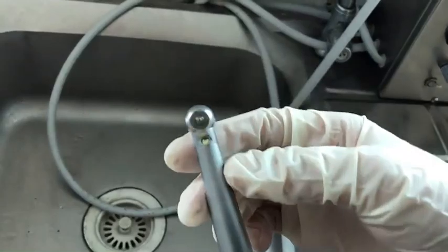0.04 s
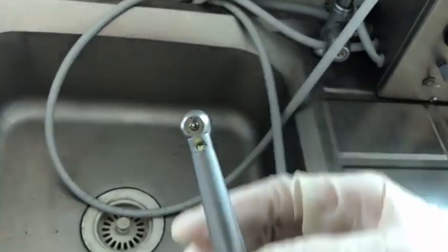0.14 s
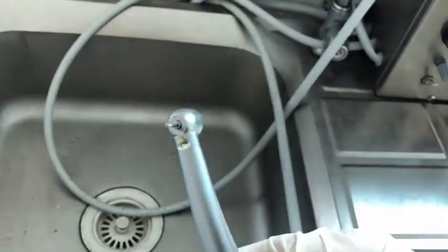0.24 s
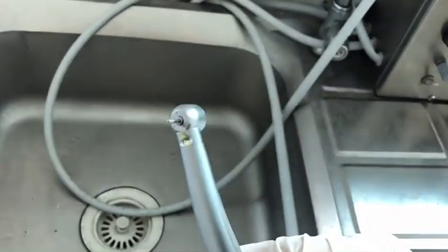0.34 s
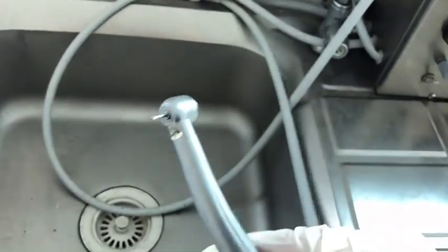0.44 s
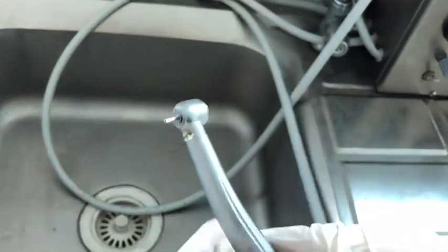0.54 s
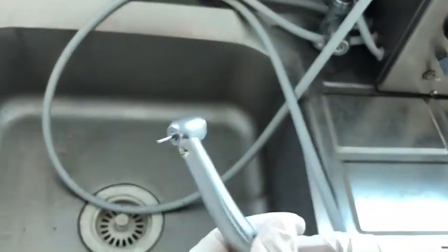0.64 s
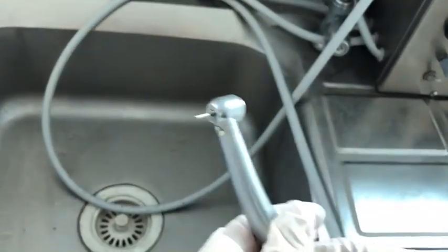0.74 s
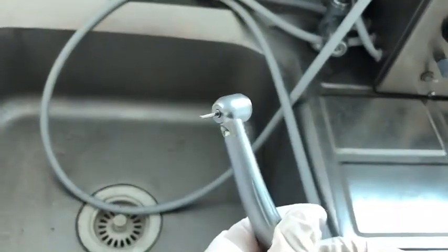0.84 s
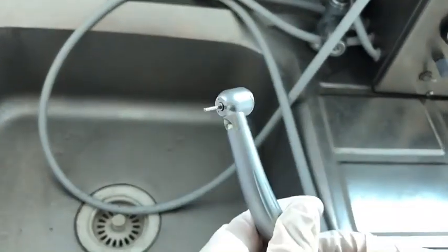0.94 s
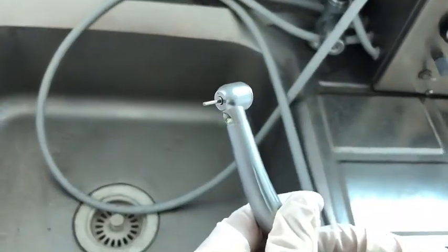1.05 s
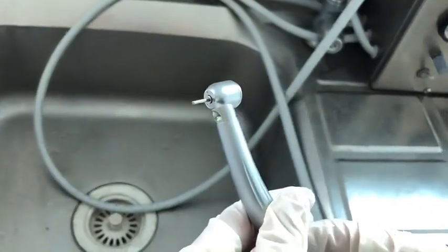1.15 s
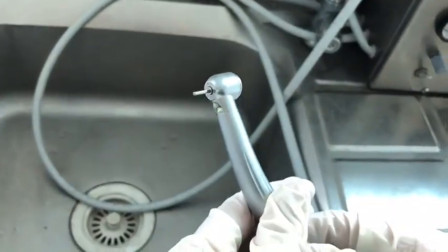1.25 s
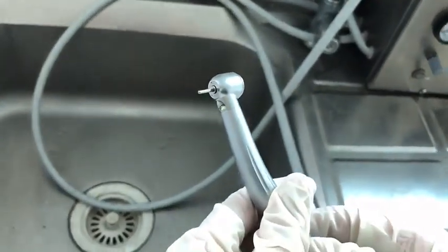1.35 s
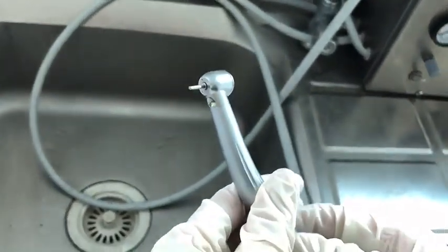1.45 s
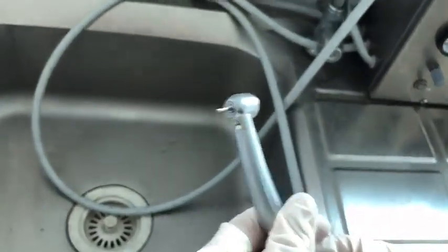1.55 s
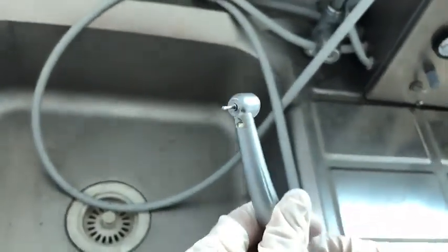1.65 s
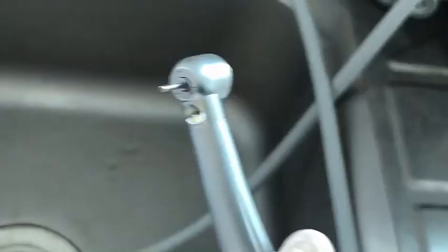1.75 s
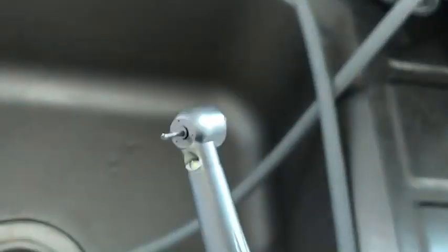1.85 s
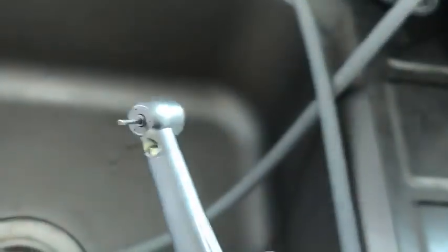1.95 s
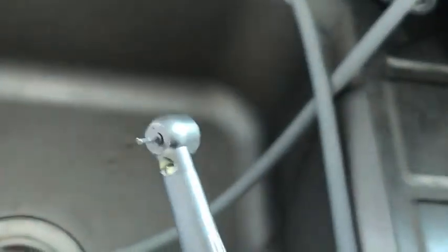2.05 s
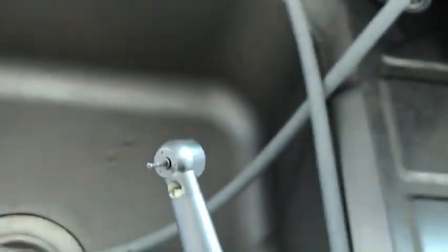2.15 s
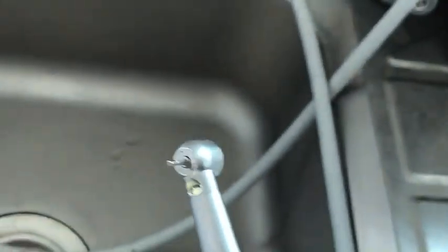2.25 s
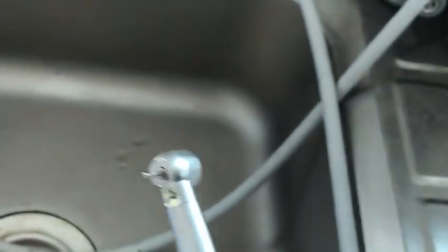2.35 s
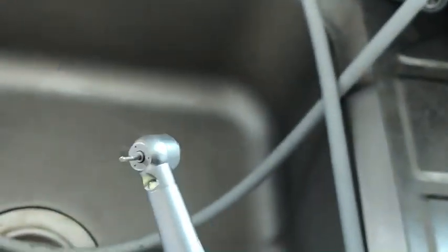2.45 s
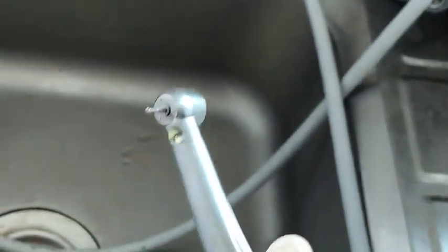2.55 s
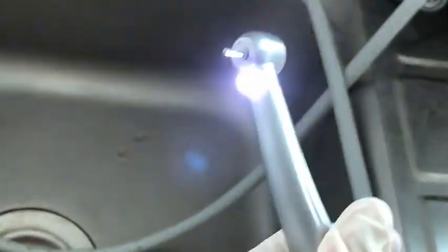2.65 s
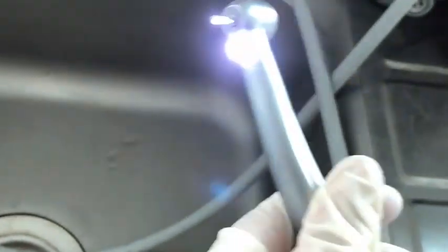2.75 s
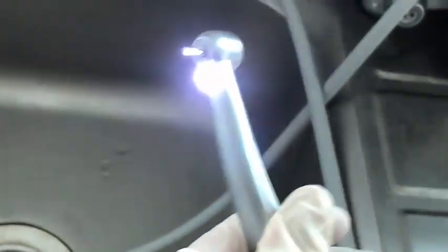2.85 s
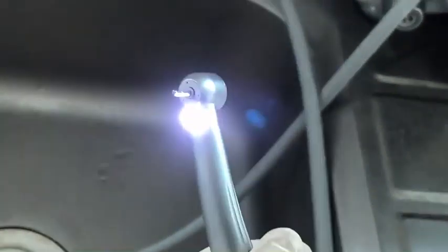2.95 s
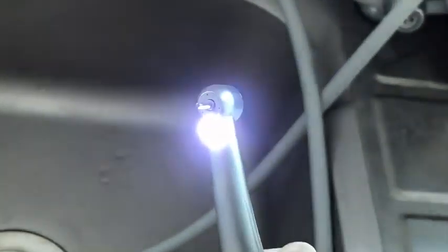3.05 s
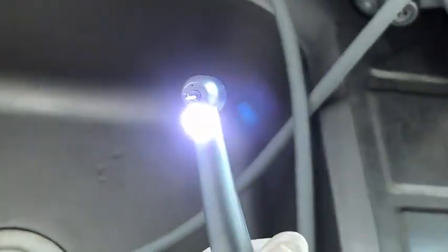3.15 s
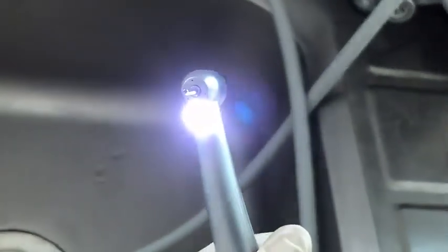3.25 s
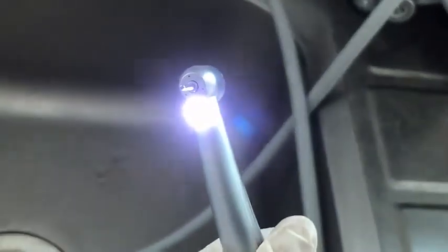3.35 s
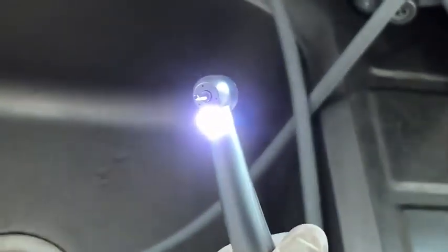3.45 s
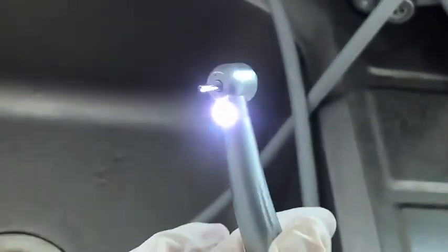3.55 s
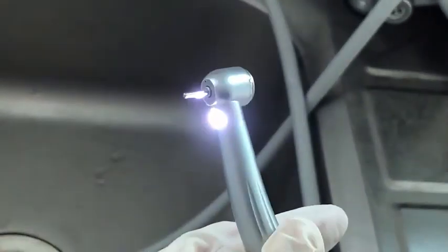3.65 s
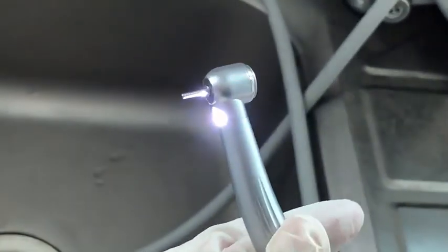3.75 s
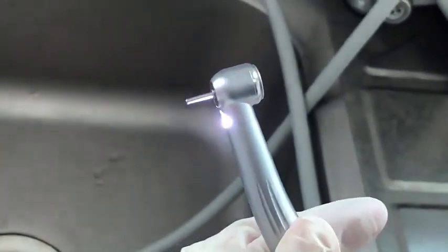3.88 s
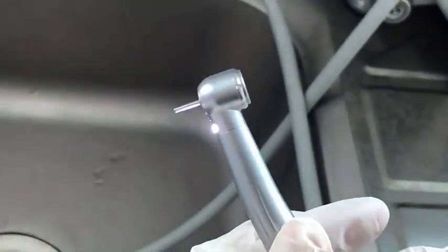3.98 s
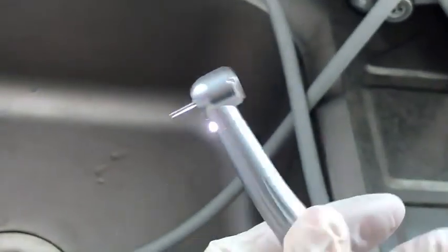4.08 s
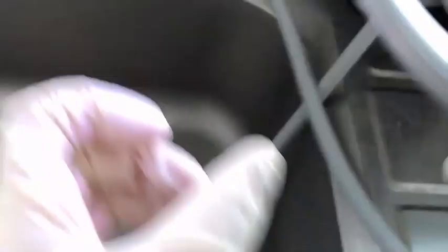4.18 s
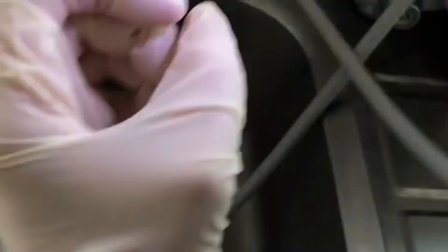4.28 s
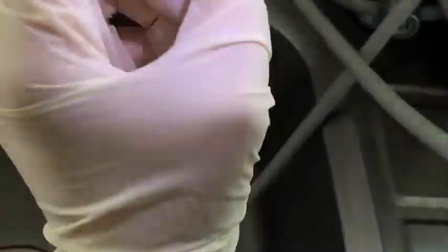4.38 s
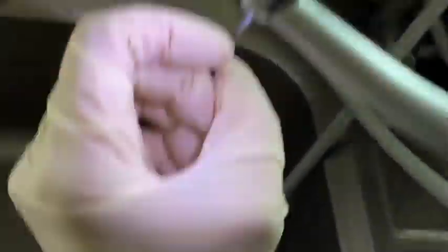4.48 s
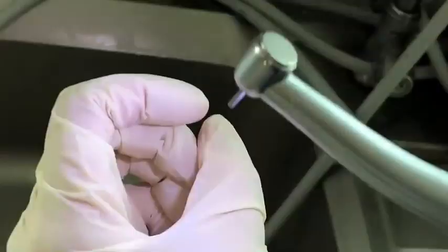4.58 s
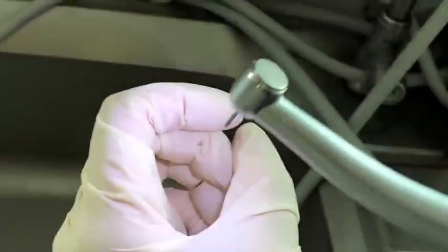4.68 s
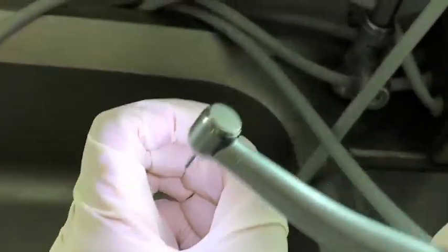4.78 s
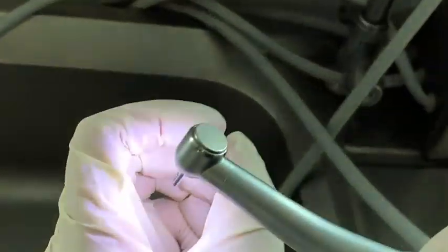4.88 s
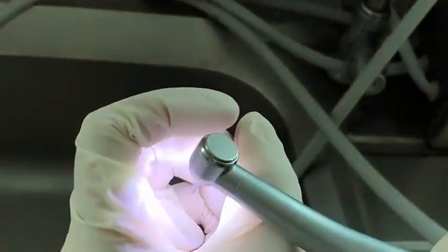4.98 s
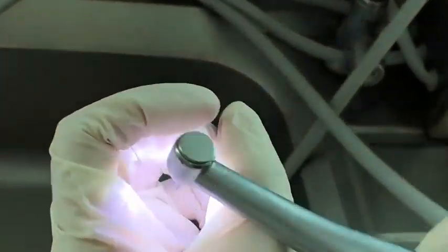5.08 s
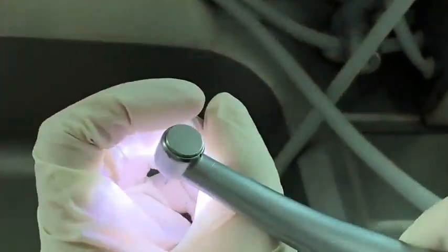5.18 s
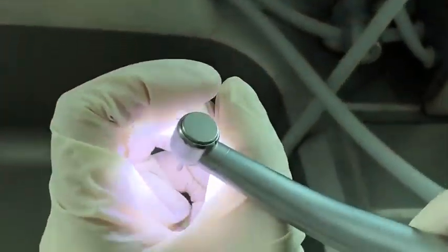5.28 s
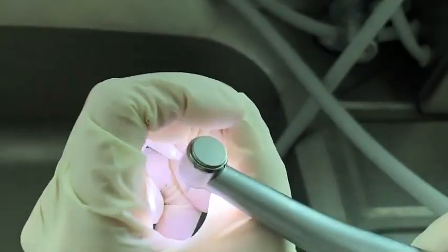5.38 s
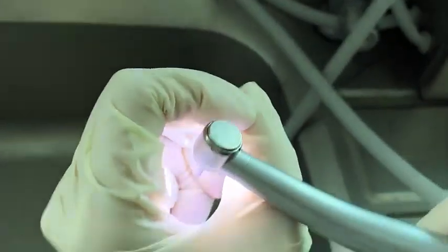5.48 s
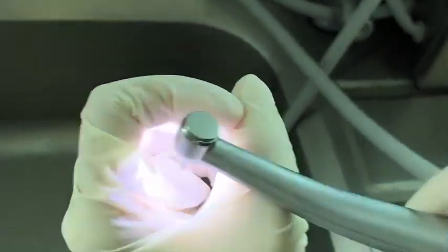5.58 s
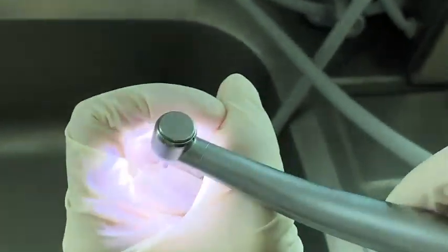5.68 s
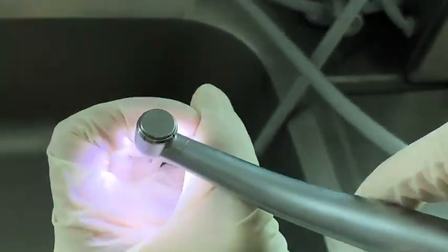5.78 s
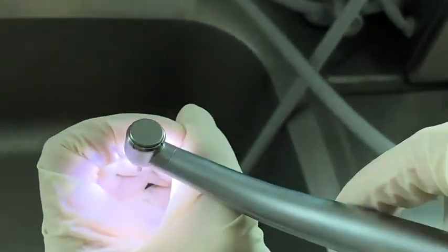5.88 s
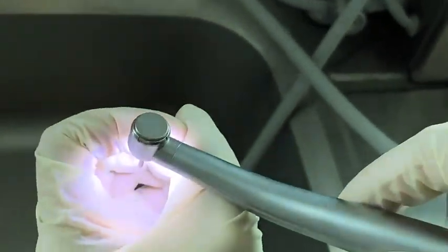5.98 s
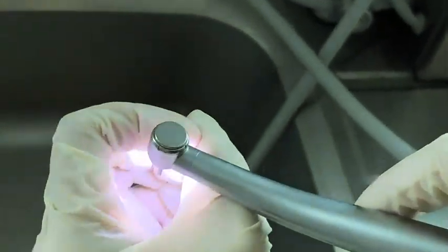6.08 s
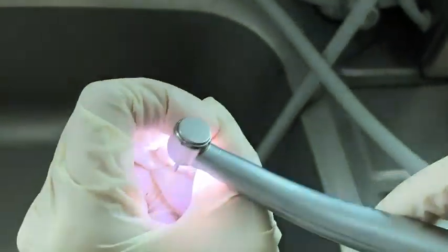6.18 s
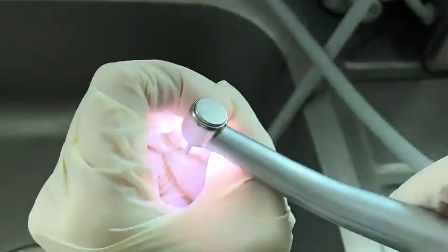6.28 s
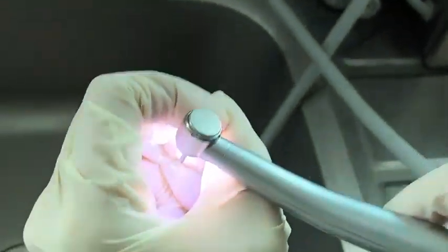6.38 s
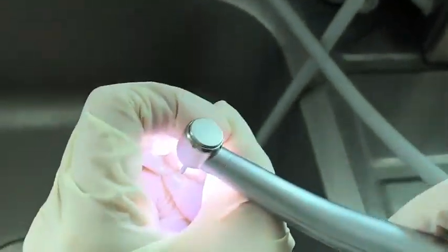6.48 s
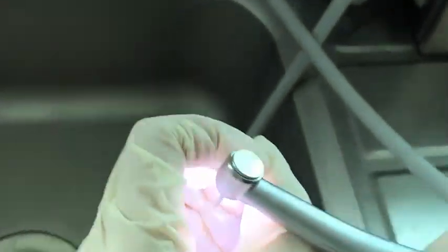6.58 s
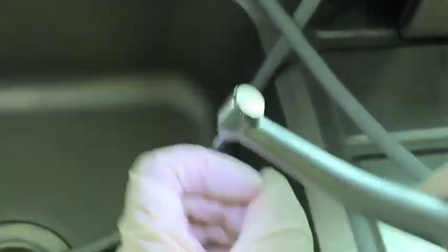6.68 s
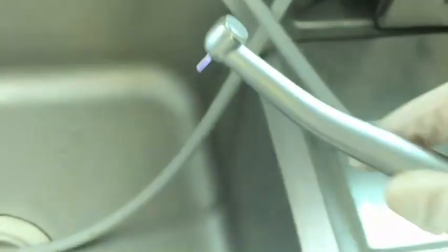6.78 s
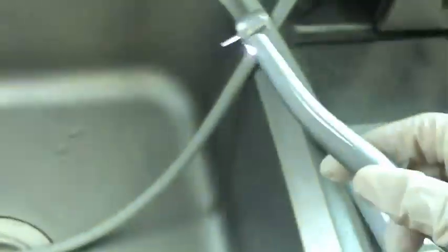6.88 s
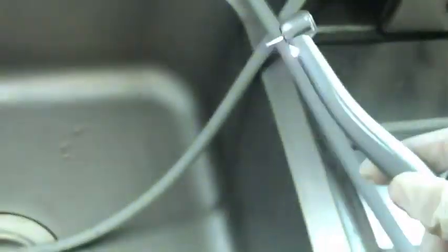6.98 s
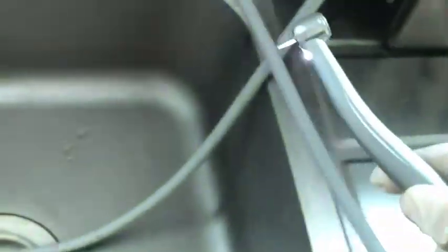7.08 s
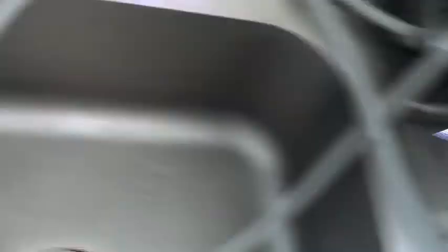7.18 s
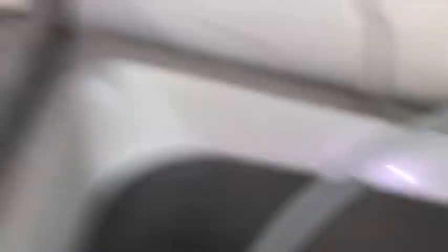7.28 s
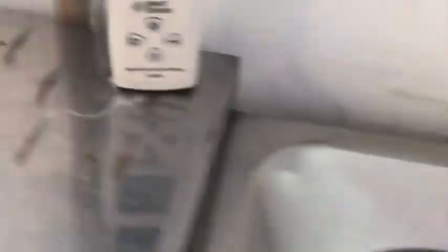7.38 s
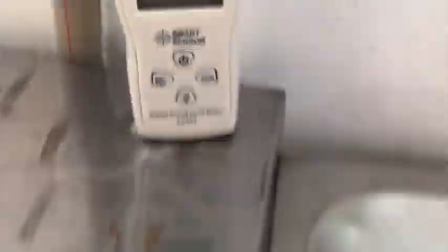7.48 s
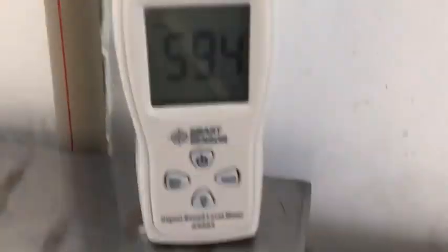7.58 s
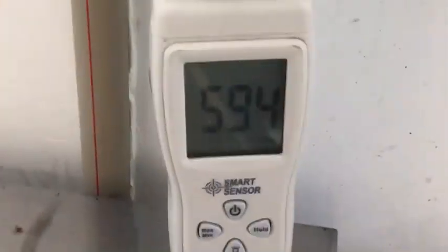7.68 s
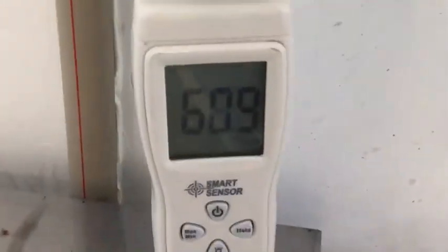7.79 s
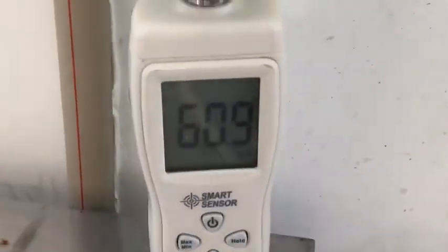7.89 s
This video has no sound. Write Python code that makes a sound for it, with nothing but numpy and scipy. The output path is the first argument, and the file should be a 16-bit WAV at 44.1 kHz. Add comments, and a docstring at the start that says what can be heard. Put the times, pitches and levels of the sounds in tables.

```python
"""A dental air turbine spins up to a thin whine inside a bright hiss, over a steel sink in a small room.
Its unbalanced rotor sings once a turn, and its exhaust air makes the hiss. Before it starts, the pedal
valve knocks, blows a burst of air through the handpiece and vents. Once it runs, the exhaust buffets
the microphone of a phone close by, a gloved hand cups the head and adds a hollow tone, and the phone
turns away. Underneath sit a low room boom, the drone of the hose and small handling noises."""
import sys
import numpy as np
from scipy import signal
from scipy.fft import rfft, irfft, next_fast_len
from scipy.io import wavfile
from scipy.ndimage import uniform_filter1d

SR = 44100
rng = np.random.default_rng(int(sys.argv[2]) if len(sys.argv) > 2 else 0)


def unload_wav(signal):
    """Save mono or channel-first audio to the path in sys.argv[1] as 16-bit WAV at rate SR, clipped to [-1, 1]."""
    wavfile.write(
        sys.argv[1],
        SR,
        np.round(np.clip(np.atleast_2d(signal).T, -1, 1) * 32767).astype(np.int16),
    )


N = 349713
T = np.arange(N) / SR
HZ = np.linspace(1, SR / 2, 2 ** 14)  # frequency axis of every noise colour
AROUND = np.arange(-int(.3 * SR), int(.6 * SR)) / SR  # seconds from the peak of a one-shot

# Levels are fader settings, ahead of each layer's trim; colours and modes only shape the spectrum.
# room tone with a low boom of machinery: frequency_hz, gain_db
ROOM_COLOUR = [(25, -26), (55, -16.5), (100, -18), (135, 0), (190, -8.5), (290, -9), (460, -17),
               (1000, -20), (1900, -28.5), (3500, -34), (12000, -41.5), (15000, -48)]
# soft bumps of hand and hose: peak_s, level_db, spread_s, pitch_hz
BUMPS = [(.223, -65, .055, 120), (1.24, -55, 0.022, 194), (2.171, -59, .03, 347), (2.5, -52, 0.022, 168),
         (3.966, -50, 0.022, 126), (3.85, -61, .22, 106), (4.413, -63.5, .1, 121),
         (5.893, -57.5, 0.067, 128), (6.918, -63.5, .021, 199), (7.92, -58, .12, 137)]
# rubs of glove and hose: peak_s, level_db, fade_s, centre_hz
RUBS = [(0.186, -71.5, 0.011, 6700), (0.298, -76, 0.015, 6500), (.445, -72.5, 0.0096, 5460),
        (0.595, -76.5, 0.05, 5400), (0.703, -72.5, 0.037, 5600), (2.232, -76, 0.014, 9000),
        (7.03, -60, 0.022, 1600), (7.339, -55, .015, 5600), (7.736, -60, .024, 2440)]
# air droning in the supply hose: time_s, level_db
HOSE_LEVEL = [(1.2, -84), (1.25, -78), (2.6, -71), (4.4, -72.5), (5.2, -72), (6.5, -69.5), (7.4, -81.5)]
# ticks of the valve resetting: peak_s, level_db
VALVE_TICKS = [(2.328, -62), (2.355, -64), (2.381, -48), (2.423, -66), (2.479, -57)]
# puffs from the pedal valve: peak_s, level_db, rise_s, fall_s, centre_hz, steepness, tail_db
VALVE_PUFFS = [(1.087, -62, .003, 0.058, 1030, 1.04, 3.5), (1.224, -42, 0.0093, 0.012, 1240, 0.89, -12.5),
               (2.135, -42.5, 0.0069, 0.0092, 1340, 0.75, -11.5),
               (2.380, -48, 0.0074, 0.0046, 3100, 0.95, -12.5), (2.505, -64, 0.018, 0.086, 626, 1.24, -12),
               (2.612, -60, 0.0058, .1, 940, 1.2, -1.5), (2.649, -45, .0045, 0.0056, 1600, 0.64, -16)]
# metal of the valve and handpiece, rung by the puffs: centre_hz, width_hz, gain_db
METAL_MODES = [(770, 70, 7.5), (1330, 300, 2.5), (1980, 180, 1.5), (2400, 170, 3), (3220, 200, -3),
               (4800, 600, 1), (6110, 300, -1), (8420, 250, -5), (9640, 500, -3), (12100, 600, -1)]
# burst of air before the turbine runs: frequency_hz, gain_db
BURST_COLOUR = [(60, -33), (170, -14), (600, -15), (1500, -9), (2400, -7), (4000, -3.5), (7000, 0),
                (9500, -1), (11500, -9), (15400, -11)]
# resonances of the ducts in the handpiece: centre_hz, width_hz, gain_db
DUCT_MODES = [(1980, 140, -1), (2460, 310, 3.5), (2945, 230, 4), (3450, 230, 5.5), (3840, 380, 4),
              (4200, 390, 5), (5190, 430, 7), (5700, 170, 4), (6100, 260, 0), (6670, 310, -4),
              (7640, 450, -6)]
# rumble of exhaust on the microphone: frequency_hz, gain_db
GUST_COLOUR = [(24, -55), (40, -9), (92, -12), (123, 1.5), (217, 1.5), (251, -2), (286, -2), (455, -4.5),
               (1120, -30.5), (1300, -44), (1690, -62), (2860, -120)]
# whooshes of exhaust across the approaching glove: peak_s, level_db
WHOOSHES = [(4.085, -57.5), (4.163, -44)]
# hollow body of a whoosh: frequency_hz, gain_db
WHOOSH_COLOUR = [(120, -20), (340, -2), (560, -4.5), (1100, 0), (1700, -4.5), (2600, -11), (4200, -39),
                 (9000, -55)]
# air caught in the cupped hand: time_s, level_db
CUP_LEVEL = [(3.9, -61.5), (4.3, -63.5), (5.2, -61), (6.5, -60.5), (7.0, -71), (7.6, -74)]
# resonances of the cupped hand: centre_hz, width_hz, gain_db
CUP_MODES = [(765, 125, -7.5), (1115, 640, -8), (1723, 410, -2), (2300, 490, -5)]
# faint narrow whistle below the whine: time_s, level_db
UNDERTONE_LEVEL = [(4.0, -78), (4.5, -72), (5.6, -75.5), (6.45, -69), (6.9, -71.5), (7.6, -77)]
# nozzle chirps as pressure builds: start_s, length_s, first_hz, last_hz, level_db
NOZZLE_CHIRPS = [(2.659, 0.048, 3500, 6400, -45), (2.67, 0.038, 9560, 11600, -41.5),
                 (2.65, 0.047, 13000, 15100, -35.5), (2.689, 0.034, 8700, 11500, -38),
                 (2.691, 0.031, 12300, 14900, -36), (2.708, 0.031, 12600, 15400, -30)]
# bright hiss of the exhaust jet: frequency_hz, gain_db
JET_COLOUR = [(290, -60), (500, -21.5), (1400, -15), (1640, -13), (1980, -14.5), (2530, -11.5),
              (3370, -12.5), (6060, -4), (6330, -0.5), (6700, -3.5), (8190, -0.5), (12800, 7), (14800, 12),
              (15400, 13)]
# hiss round 8 kHz as the head is turned and shaded: time_s, level_db
HISS_LEVEL = [(2.78, -51), (3.12, -52.5), (4.43, -48.5), (4.76, -51.5), (5.59, -50), (5.73, -53.5),
              (6.39, -49.5), (6.62, -51), (6.75, -53.5), (7.18, -53), (7.4, -57), (7.93, -57.5)]
# top lobe of that hiss: time_s, level_db
TREBLE_LEVEL = [(2.78, -47), (2.98, -48.5), (4.16, -50), (4.4, -46), (4.82, -51.5), (4.99, -47),
                (5.03, -55.5), (5.38, -53.5), (5.48, -48.5), (5.59, -53), (5.65, -50), (5.78, -51),
                (6.52, -49.5), (6.7, -50), (6.84, -52.5), (7.33, -50), (7.53, -51.5), (7.93, -50)]
# bands of hiss thrown back by nearby surfaces: start_s, end_s, centre_hz, width_hz, level_db
SHEENS = [(2.81, 3.6, 11840, 1600, -53), (4.14, 4.58, 4900, 2600, -58), (5.0, 5.7, 5500, 1400, -62.5),
          (6.1, 6.64, 8000, 1100, -54)]
# rotor whine as the head is turned: time_s, level_db
WHINE_LEVEL = [(2.98, -58), (3.19, -49.5), (3.63, -41), (4.26, -62), (4.48, -52), (4.52, -58),
               (5.23, -44.5), (5.49, -51), (6.59, -50.5), (6.77, -58.5), (7.18, -56), (7.24, -61),
               (7.46, -52), (7.5, -69), (7.54, -56.5), (7.65, -74), (7.93, -63)]


def undb(db):
    """Decibels to gain."""
    return 10 ** (np.asarray(db) / 20)


def curve(table):
    """Automation line through (time_s, value) points."""
    return np.interp(T, *np.transpose(table))


def fader(table):
    """Gain from a level curve; silent before its first point, dying away after its last."""
    fade_out = np.exp(-np.maximum(T - table[-1][0], 0) / 0.14)
    return undb(curve(table)) * (T >= table[0][0]) * fade_out


def held(start_s, end_s, attack_s, release_s):
    """Envelope of a flow that builds, holds and dies away."""
    onset = 1 - np.exp(-np.maximum(T - start_s, 0) / attack_s)
    return onset * np.exp(-np.maximum(T - end_s, 0) / release_s)


def bell(offset, spread):
    """A smooth swell, 1 where the offset is zero."""
    return np.exp(-(offset / spread) ** 2 / 2)


def swell_and_fall(rise_s, fall_s):
    """One-shot envelope with a rounded attack and an exponential tail."""
    return bell(np.minimum(AROUND, 0), rise_s) * np.exp(-np.maximum(AROUND, 0) / fall_s)


def walk(rate_hz):
    """Smooth random modulation with a spread near 1."""
    hold = max(int(SR / rate_hz), 2)
    steps = rng.standard_normal(N)[np.arange(N) // hold]
    return uniform_filter1d(uniform_filter1d(steps, hold), hold) * np.sqrt(2)


def colour(points):
    """EQ curve through (frequency_hz, gain_db) points."""
    hz, db = np.transpose(points)
    return undb(np.interp(np.log(HZ), np.log(hz), db))


def resonance(hz, width_hz):
    """EQ curve of one resonance, 1 at its centre; raising it to a power changes its steepness."""
    return 1 / np.sqrt(1 + ((HZ ** 2 - hz ** 2) / (HZ * width_hz)) ** 2)


def rolloff(hz, order):
    """EQ curve of a high cut."""
    return 1 / (1 + (HZ / hz) ** order)


def cavity(modes):
    """EQ curve of several resonances, with dark valleys between them."""
    return np.sqrt(sum((undb(db) * resonance(hz, width) ** 2) ** 2 for hz, width, db in modes))


def noise(eq, band_hz=None, count=N):
    """Coloured turbulence, with rms 1 overall or inside a band."""
    size = next_fast_len(count, True)
    hz = np.fft.rfftfreq(size, 1 / SR)
    gain = np.interp(hz, HZ, eq)
    inside = 1 if band_hz is None else (hz > band_hz[0]) & (hz < band_hz[1])
    coloured = irfft(rfft(rng.standard_normal(size)) * gain, size)[:count]
    return coloured / np.sqrt(np.mean(gain ** 2 * inside))


def add_shot(out, peak_s, db, envelope, eq):
    """Mix in a one-shot of coloured noise."""
    index = int((peak_s + AROUND[0]) * SR) + np.arange(len(AROUND))
    inside = (index >= 0) & (index < N)
    shot = undb(db) * envelope * noise(eq, count=len(AROUND))
    out[index[inside]] += shot[inside]


def room_tone():
    """A steady bed with a low boom of machinery."""
    return noise(colour(ROOM_COLOUR)) * undb(-70)


def handling_bumps():
    """Bumps of the hand and hose swell softly in the bass."""
    out = np.zeros(N)
    for at, db, spread, hz in BUMPS:
        body = resonance(hz, .5 * hz) ** 1.24 * rolloff(2 * hz, order=4)
        add_shot(out, at, db, bell(AROUND, spread), body)
    return out


def glove_rubs():
    """Grainy little slips of rubber on metal."""
    out = np.zeros(N)
    for at, db, fade, hz in RUBS:
        add_shot(out, at, db, np.exp(-np.abs(AROUND) / fade), resonance(hz, 0.19 * hz) ** 0.53)
    return out * undb(3.2 * walk(500))


def air_supply():
    """The hose drones under pressure, and a faint hum runs down once the valve has vented."""
    drone = noise(resonance(hz=311, width_hz=89) ** 1.03) * fader(HOSE_LEVEL)
    vent_s, slowing_s, first_hz, last_hz = 2.15, 0.29, 418, 208.5
    hz = last_hz + (first_hz - last_hz) * np.exp(-np.maximum(T - vent_s, 0) / slowing_s)
    phase = 2 * np.pi * np.cumsum(hz * (1 + 0.01365 * walk(38.9))) / SR
    hum = np.sqrt(2) * np.sin(phase) * held(vent_s, 3.3, attack_s=.01, release_s=0.092)
    return drone + hum * undb(-71.5)


def valve_ticks():
    """The valve resets with tiny bright ticks."""
    out = np.zeros(N)
    snap = np.exp(-np.abs(AROUND) / 0.0013)
    for at, db in VALVE_TICKS:
        add_shot(out, at, db, snap, resonance(hz=12500, width_hz=5000) ** 0.51)
    return out


def valve_puffs():
    """Quick knocks of air, and the bright spit that ends the burst, leave the metal ringing."""
    out = np.zeros(N)
    metal = np.hypot(cavity(METAL_MODES), undb(-9))
    low_cut = 1 / (1 + (175 / HZ) ** 4)
    for at, db, rise, fall, hz, steepness, tail_db in VALVE_PUFFS:
        body = resonance(hz, 0.91 * hz) ** steepness
        add_shot(out, at, db, swell_and_fall(rise, fall), body * low_cut)
        dull_ring = body ** 1.25 * low_cut * metal
        add_shot(out, at, db + tail_db, swell_and_fall(rise, fall_s=0.057), dull_ring)
    spit_s, rise_s = 1.976, 0.011
    spit = resonance(hz=12400, width_hz=4900) ** 0.49 * low_cut
    spit_ring = resonance(hz=4500, width_hz=2400) ** 0.79 * metal
    add_shot(out, spit_s, db=-37, envelope=swell_and_fall(rise_s, fall_s=0.019), eq=spit)
    add_shot(out, spit_s, db=-45.5, envelope=swell_and_fall(rise_s, fall_s=0.042), eq=spit_ring)
    return out


def air_burst():
    """Air rushes through the ducts of the handpiece and rings them; the room holds the hiss briefly."""
    ducts = colour(BURST_COLOUR) * np.hypot(cavity(DUCT_MODES), undb(-7))
    span_s = (1.21, 1.962)
    direct = held(*span_s, attack_s=0.034, release_s=.014)
    room_tail = undb(-20) * held(*span_s, attack_s=0.12, release_s=0.12)
    return noise(ducts) * np.hypot(direct, room_tail) * undb(-46.6 + .5 * walk(40.2))


def microphone_gust():
    """Exhaust eddies rumble on the microphone port, with a last hard buffet as the jet swings away."""
    eddies = noise(colour(GUST_COLOUR) * rolloff(1400, order=6), band_hz=(200, 1000))
    buffet = bell(T - 3.515, 0.0068)
    level_db = -47 + 8 * buffet + 2.7 * walk(70) * (1 - buffet)
    return eddies * held(3.125, 3.52, attack_s=0.045, release_s=0.023) * undb(level_db)


def glove_whooshes():
    """The exhaust gives a hollow whoosh each time it crosses the glove."""
    out = np.zeros(N)
    for at, db in WHOOSHES:
        add_shot(out, at, db, swell_and_fall(rise_s=.013, fall_s=0.058), colour(WHOOSH_COLOUR))
    return out


def cupped_hand():
    """The jet excites the hollow of the glove, and a narrow whistle wavers above it."""
    hollow = noise(cavity(CUP_MODES) * rolloff(3200, order=4)) * fader(CUP_LEVEL) * undb(-4.5)
    whistle = noise(resonance(hz=2563, width_hz=26) ** 2) * fader(UNDERTONE_LEVEL)
    return hollow + whistle


def nozzle_chirps():
    """Breathy edge tones sweep upward while the drive air gathers pressure."""
    out = np.zeros(N)
    for start, length, first_hz, last_hz, db in NOZZLE_CHIRPS:
        progress = np.clip((T - start) / length, 0, 1)
        phase = 2 * np.pi * np.cumsum(first_hz + (last_hz - first_hz) * progress) / SR
        breathy_tone = np.sqrt(2) * np.sin(phase + 1.05 * walk(1500))
        out += undb(db) * np.sin(np.pi * progress) ** 2 * breathy_tone
    return out


def steel_echo(hiss):
    """As the phone turns away, an echo off the steel top grows and hollows the hiss."""
    share = np.interp(T, [7.4, 7.65], [.08, .35])
    echo = np.roll(hiss, int(0.001406 * SR))
    return (hiss + share * echo) / np.sqrt(1 + share ** 2)


def surface_sheen():
    """Surfaces near the head each throw back one band of hiss for a while."""
    return sum(noise(resonance(hz, width) ** 2) * held(start, end, 0.077, 0.077) * undb(db)
               for start, end, hz, width, db in SHEENS)


def exhaust_hiss():
    """Exhaust air hisses in four broad lobes, the higher ones beamed more sharply as the head turns."""
    bands_hz = [(2800, 5800), (6800, 9500), (9500, 13000), (13000, 15500)]
    crossfades = np.log([5400, 7320, 7770, 10420, 11650, 13900])  # lobes blend across each pair of Hz
    hiss_db, treble_db = curve(HISS_LEVEL), curve(TREBLE_LEVEL)
    low_db = -58.5 + 0.49 * (hiss_db - np.mean(hiss_db))
    glove_muffle_db = -1.5 * held(5.0, 5.9, attack_s=.06, release_s=.06)
    upper_db = hiss_db + 0.73 * (treble_db - hiss_db) + glove_muffle_db - 0.53
    spectrum, lobes = colour(JET_COLOUR), 0
    for (bottom, top), solo, db in zip(bands_hz, np.eye(4), [low_db, hiss_db, upper_db, treble_db]):
        share = np.interp(np.log(HZ), crossfades, np.repeat(solo, 2)[1:-1])
        eq = spectrum * np.sqrt(share)
        # make-up gain for the power that spills outside the lobe's own band
        makeup = np.sqrt(np.sum(eq ** 2) / np.sum(spectrum[(HZ > bottom) & (HZ < top)] ** 2))
        lobes += makeup * noise(eq) * undb(db + 0.43 * walk(25))
    # the drive air comes on and overshoots once before it settles
    on_s, rise_s, surge_s, surge_db = 2.636, 0.0168, 2.688, 4
    drive = (1 + np.tanh((T - on_s) / rise_s)) / 2
    surge = undb(surge_db * bell(T - surge_s, 0.018))
    return (lobes + surface_sheen()) * drive * surge * undb(-0.26 + 0.32 * walk(60))


def rotor_whine():
    """The unbalanced rotor sings once a turn; reflections off hand and sink make each partial flutter."""
    # speed climbs until drag balances the drive, then sags with the supply pressure
    start_s, spin_up_s, full_hz, sag_from_s, sag_hz_per_s = 2.668, .193, 6379, 4.6, 22
    hz = full_hz * np.tanh(np.maximum(T - start_s, 0) / spin_up_s)
    hz -= sag_hz_per_s * np.maximum(T - sag_from_s, 0)
    hz *= 1 + .0002 * walk(25) + .0004 * walk(300)
    turn = np.exp(2j * np.pi * np.cumsum(hz) / SR)
    # the flutter is deeper while the pitch sweeps through the standing waves of the sink
    depth = np.interp(T, [2.9, 3.3], [.8, .24])
    fundamental = turn * (1 + depth * (walk(45) + 1j * walk(45))) / np.sqrt(1 + 2 * depth ** 2)
    octave_gain = undb(-16) * np.clip(T - 4, .2, 1)
    octave = turn ** 2 * (1 + 0.72 * (walk(40) + 1j * walk(33))) * octave_gain
    # the whine grows with speed and flares as it crosses a resonance of the head
    flare_hz, flare_spread_hz, flare_db = 4630, 200, 4
    growth = (hz / full_hz) ** 0.93 * undb(flare_db * bell(hz - flare_hz, flare_spread_hz))
    level_db = curve(WHINE_LEVEL) - 1.5 + 0.6 * walk(15)
    return np.sqrt(2) * (fundamental + octave).imag * growth * undb(level_db)


def scene():
    """One microphone hears it all, so both channels are alike."""
    turbine = rotor_whine() + steel_echo(exhaust_hiss()) + nozzle_chirps() + cupped_hand()
    pedal_air = air_burst() + valve_puffs() + valve_ticks() + air_supply()
    handling = microphone_gust() + glove_whooshes() + glove_rubs() + handling_bumps()
    mono = turbine + pedal_air + handling + room_tone()
    return np.array([mono, mono])


def record(dry):
    """The phone cuts the top steeply above 15.5 kHz."""
    return signal.sosfilt(signal.ellip(12, .1, 75, 15500, fs=SR, output="sos"), dry)


dry = scene()
out = record(dry)
unload_wav(out)
```